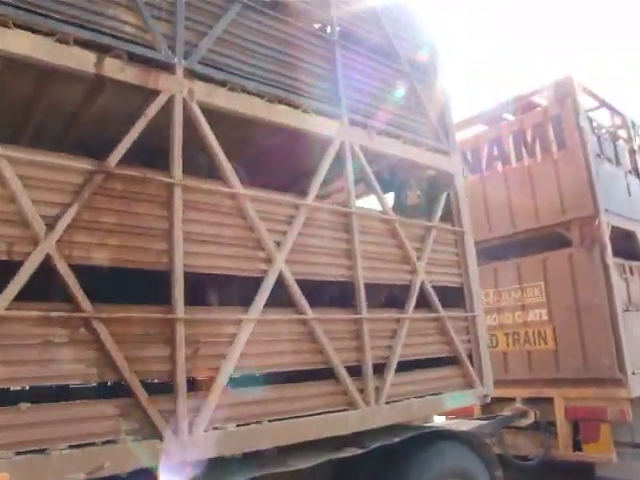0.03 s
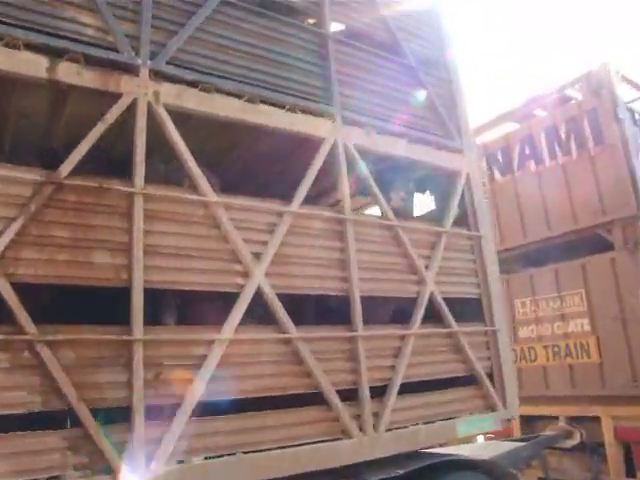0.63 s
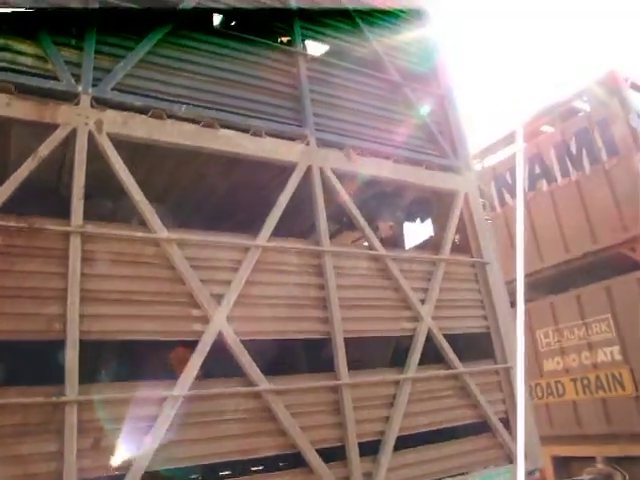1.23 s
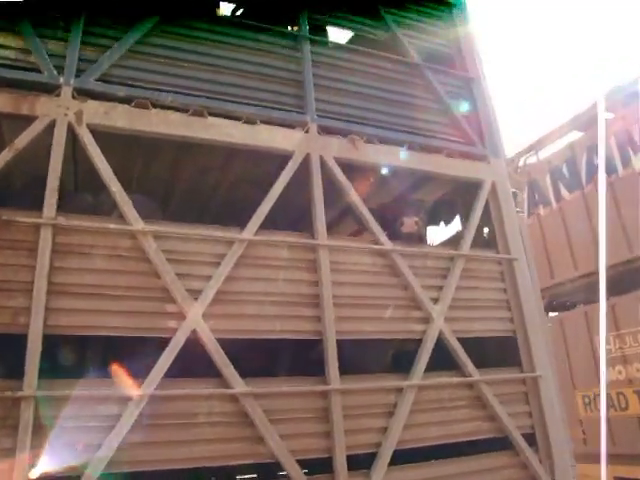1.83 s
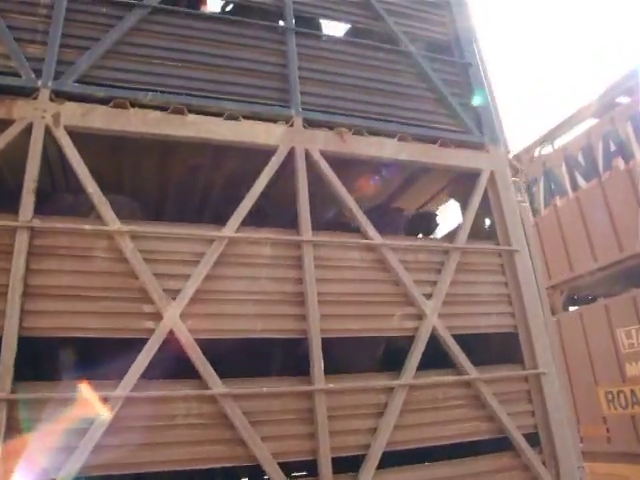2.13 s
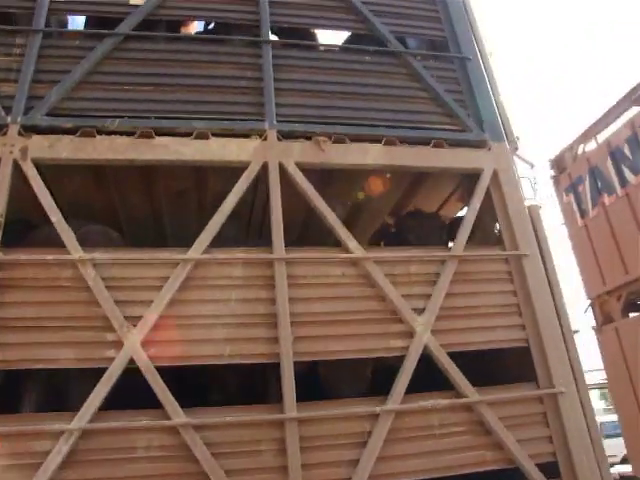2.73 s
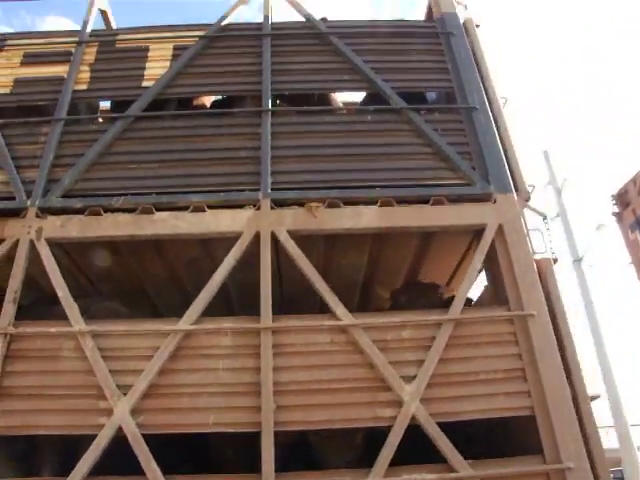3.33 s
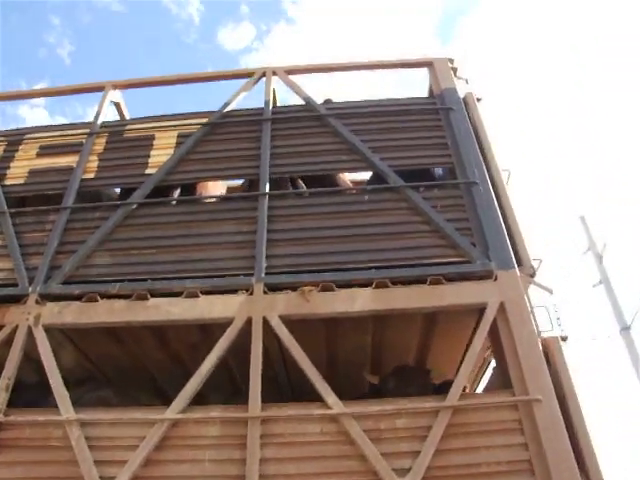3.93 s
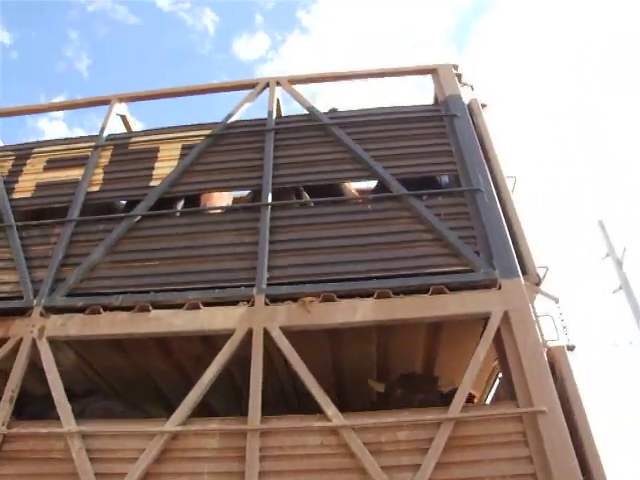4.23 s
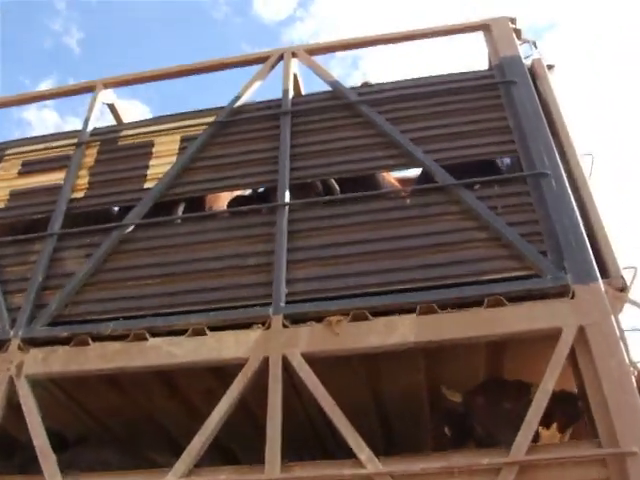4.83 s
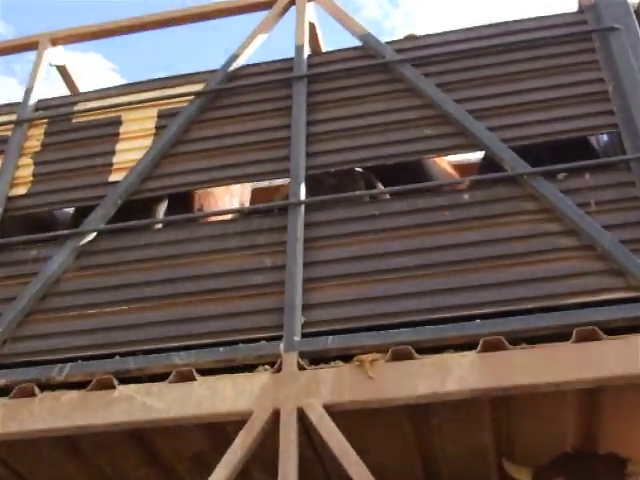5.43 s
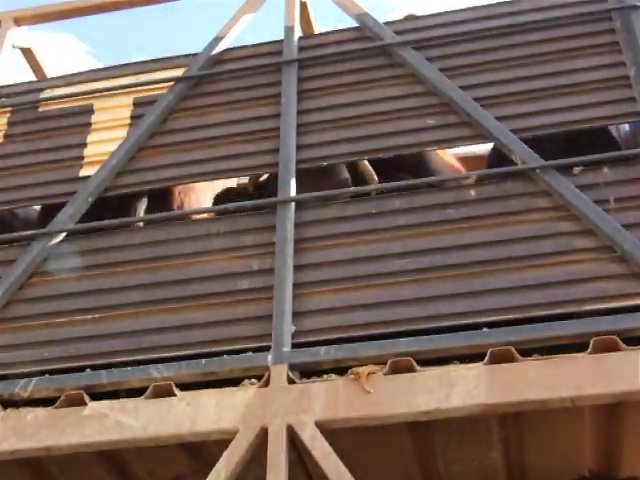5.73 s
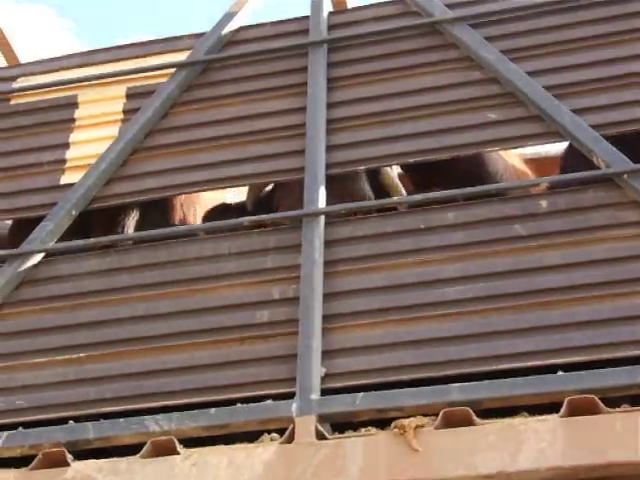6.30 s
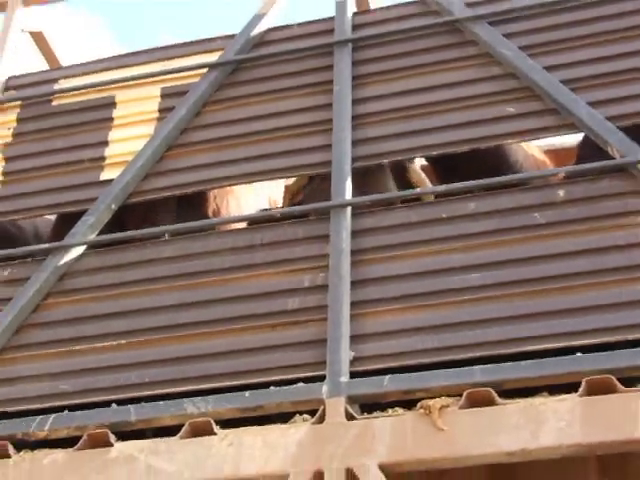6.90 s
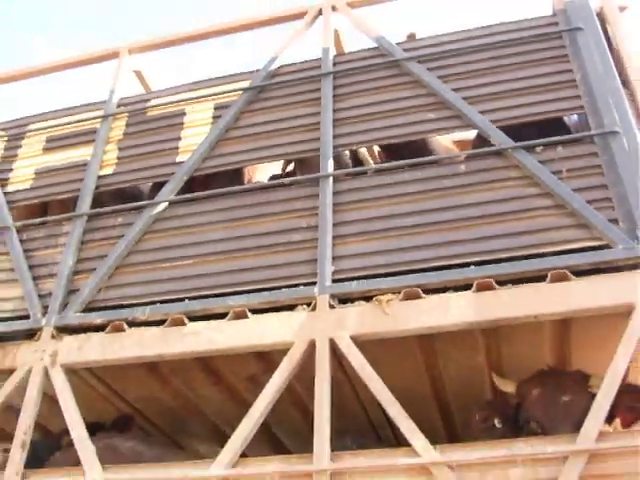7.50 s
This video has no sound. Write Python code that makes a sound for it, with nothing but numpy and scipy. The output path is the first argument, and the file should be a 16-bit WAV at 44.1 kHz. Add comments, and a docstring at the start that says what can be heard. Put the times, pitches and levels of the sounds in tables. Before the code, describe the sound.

Hooves knock and metal slats rattle as cattle shift inside a livestock trailer, while wind gusts rise over a distant engine hum.

```python
"""Cattle shift about in a steel livestock trailer parked outdoors, while an engine idles far off.
From the start, hooves shuffle and knock on the deck plates, bodies bump panels and gates, and horns
and loose fittings clack on the slats; the steel rings and its walls echo. The heaviest bump comes
near 2.8 s. From 4.4 s a bird whistles faintly now and then. After 5 s, turbulent wind buffets the
microphone more and more, up to the end."""
import sys
import numpy as np
from scipy import signal
from scipy.fft import rfft, irfft, next_fast_len
from scipy.io import wavfile
from scipy.ndimage import uniform_filter1d

SR = 44100
rng = np.random.default_rng(int(sys.argv[2]) if len(sys.argv) > 2 else 0)


def wav_record(signal):
    """Record a signal, one row per channel, as 16-bit PCM in the file named by sys.argv[1]."""
    frames = np.transpose(np.atleast_2d(signal))
    bounded = np.clip(frames, -1, 1)
    # unit amplitude maps onto the largest positive 16-bit level
    quanta = np.round(bounded * 32767).astype(np.int16)
    wavfile.write(sys.argv[1], SR, quanta)


N = 333396
T = np.arange(N) / SR

# Levels in the tables are relative: each source applies its own gain.
# spectrum of the open air: (frequency [Hz], level [dB])
AIR_SPECTRUM = [(10, -2), (30, -7.5), (55, 2), (68, -2.5), (85, -7), (200, -18.5), (500, -21.5),
                (1300, -29), (3000, -40), (7000, -39), (9000, -49.5)]
# harmonics of the idling engine: (frequency [Hz], level [dB])
ENGINE_HARMONICS = [(29.6, -51), (59.2, -44), (118.4, -51)]
# bird notes: (time [s], duration [s], mid frequency [Hz], glide [Hz/s], level [dB])
BIRD_NOTES = [(4.431, 0.083, 4150, 6003, -43), (4.435, 0.079, 3400, 3998, -44),
              (5.563, 0.055, 2950, -8000, -37), (7.163, 0.077, 2410, 2000, -35),
              (7.233, 0.065, 3060, -7000, -43), (7.346, 0.11, 2980, -3000, -39)]
# spectrum of the turbulence: (frequency [Hz], level [dB])
WIND_SPECTRUM = [(15, -15.5), (45, 0), (75, 0), (120, 1), (150, 0.5), (175, -1.5), (230, -2.5), (310, -7),
                 (450, -14.5), (800, -23.5), (1600, -42), (4000, -72)]
# wind strength: (time [s], level [dB])
WIND_LEVELS = [(0, -36), (1.6, -43), (2.7, -49), (3.35, -32), (3.88, -46), (4.1, -36), (4.7, -36.5),
               (5.17, -30), (5.4, -26.5), (5.8, -21), (6.1, -25), (6.55, -25.5), (6.8, -15.5), (7.08, -22),
               (7.56, -13)]
# strongest eddies: (peak time [s], level [dB], centre frequency [Hz], wake width [s])
EDDIES = [(.358, -8.5, 118, 0.031), (4.016, -11.5, 118, 0.0074), (4.388, -12.5, 128, 0.015),
          (4.981, -17.5, 91, 0.012), (5.333, -7, 235, 0.013), (5.486, -9, 78, 0.0034),
          (5.566, -11, 124, 0.011), (5.693, -5.5, 163, 0.0052), (5.837, -10, 218, 0.0085),
          (5.955, -16.5, 150, 0.0071), (6.21, -10.5, 160, 0.0063), (6.279, -10.5, 95, .007),
          (6.69, -6.5, 153, .007), (6.71, -0.5, 340, 0.0059), (6.804, -3, 181, 0.0063),
          (6.899, -9, 209, 0.0082), (7, -13, 159, 0.0097), (7.118, -11, 130, 0.011),
          (7.264, -6, 146, 0.012), (7.382, -3.5, 228, 0.0029), (7.459, -8, 220, 0.0081),
          (7.521, -7, 138, 0.0049)]
# reverberation in the trailer: (frequency [Hz], t60 [s])
TRAILER_DECAY = [(150, 0.59), (600, 0.42), (2000, 0.22), (8000, 0.28)]
# modes of the bars and frame: (frequency [Hz], level [dB], t60 [s])
FRAME_MODES = [(273, -14, 0.058), (547, -25, 0.053), (900, -24, 0.1), (1308, -26, 0.11), (2316, -16, 0.067),
               (4630, -18.5, 0.36), (6060, -13.5, .12), (7370, -6.5, 0.056)]
# restlessness of the herd: (time [s], trampling level [dB], scraping level [dB])
HERD_LEVELS = [(0, -32.5, -48), (.65, -42.5, -49), (.97, -34.5, -43), (1.3, -28, -42.5), (1.66, -39, -49),
               (2.05, -31.5, -40), (2.7, -44, -48.5), (3.2, -39, -38.5), (3.5, -40.5, -50),
               (3.88, -56, -47), (4.3, -30, -43), (4.66, -43, -44), (4.85, -32, -42), (5.17, -31.5, -38),
               (5.42, -40.5, -47), (5.62, -33.5, -50), (6.3, -45.5, -44), (6.6, -29, -45.5),
               (7.56, -35, -49)]
# spectrum of light steps: (frequency [Hz], level [dB])
TRAMPLE_SPECTRUM = [(60, -21), (160, 1), (290, 4), (450, 4), (750, 0), (1300, -4), (2000, -13), (3200, -22),
                    (5000, -20.5), (8000, -34.5)]
# spectrum of scraping: (frequency [Hz], level [dB])
SCRAPE_SPECTRUM = [(800, -13.5), (2000, 3), (3500, -6.5), (5000, -5.5), (7000, -3), (8500, -17)]
# bumps on a panel or gate: (time [s], level [dB], frequency [Hz], t60 [s])
PANEL_BUMPS = [(.01, -26, 298, 0.8), (.35, -21, 215, 0.068), (1.096, -20, 170, 0.23),
               (1.43, -13.5, 336, 0.071), (1.884, -14, 326, 0.13), (2.54, -16, 216, 0.2),
               (2.782, -6, 230, 0.1), (2.945, -13, 276, .079), (2.95, -21.5, 140, .2),
               (2.995, -24.5, 77, 1.44), (3.304, -26, 457, .1), (3.423, -23, 352.5, 0.22),
               (4.005, -24, 1980, 0.059), (4.45, -23.5, 395.6, 0.26), (5.638, -23, 1456, 0.13),
               (6.241, -33, 2580, 0.063), (6.289, -15, 496, 0.053), (6.494, -19, 2330, 0.12),
               (6.514, -15.5, 837, 0.11), (6.6, -31, 1160, 0.37), (7.257, -29, 1300, 0.044)]
# response of the slats: (frequency [Hz], level [dB])
SLAT_SPECTRUM = [(300, -23), (1000, -7.5), (2200, -4.5), (3500, -7.5), (5000, -2), (6300, -0.5),
                 (7400, 0.5), (8500, -11)]
# hard contacts on the slats: (time [s], level [dB], resonance [Hz], t60 [s])
SLAT_STRIKES = [(.38, -32, 6030, 0.27), (.549, -35.5, 3500, 0.11), (.823, -26, 4800, 0.046),
                (.869, -29, 7260, 0.16), (1.397, -19.5, 7140, 0.12), (1.518, -15, 5170, 0.051),
                (1.656, -31, 3800, 0.032), (1.713, -30, 5600, 0.3), (1.755, -27, 6760, 0.25),
                (1.829, -25, 5500, .084), (1.965, -11, 6430, 0.21), (2.22, -10.5, 7500, 0.11),
                (2.37, -29, 5640, 0.14), (2.459, -30.5, 6100, 0.19), (2.965, -19, 6800, 0.14),
                (3.089, -21.5, 6900, 0.25), (3.117, -14.5, 6840, .12), (3.156, -13, 6100, 0.11),
                (3.213, -12.5, 6330, 0.093), (3.331, -19, 7150, 0.11), (3.783, -38.5, 2310, 0.14),
                (4.026, -29, 5800, 0.091), (4.142, -31, 3630, 0.25), (4.244, -20, 7800, 0.17),
                (4.277, -18, 7600, 0.073), (4.578, -23.5, 6700, 0.13), (4.944, -8, 7860, 0.088),
                (5.112, -22, 4550, 0.045), (5.266, -27, 4030, 0.092), (5.331, -31, 3330, 0.076),
                (5.514, -17.5, 5500, 0.042), (5.638, -31, 4330, .12), (5.66, -19, 7300, 0.055),
                (5.734, -30, 7600, 0.27), (6.145, -37, 3900, .13), (6.498, -23, 3400, 0.077),
                (6.55, -30, 4200, .16), (6.7, -20, 7060, 0.091), (6.861, -30, 6550, 0.25),
                (7.035, -33, 3940, 0.17), (7.156, -32, 3860, 0.23), (7.214, -29.5, 4670, 0.1)]
# response of the deck: (frequency [Hz], level [dB])
DECK_SPECTRUM = [(60, -13), (150, -0.5), (300, 1), (700, 0.5), (1000, -1.5), (1450, -0.5), (1900, -1.5),
                 (3000, -11), (4500, -16.5), (8000, -46.5)]
# firm steps on the deck: (time [s], level [dB], treble level [dB], resonance [Hz], t60 [s])
HOOF_STRIKES = [(.054, -33, -28, 520, 0.13), (0.349, -21, -39, 700, 0.046), (.541, -11, -16.5, 670, 0.18),
                (.78, -17.5, -23, 706, 0.48), (0.89, -20, -42, 774, 0.37), (1.099, -20, -41, 497, 0.12),
                (1.148, -18, -32, 464, 0.17), (1.196, -8.5, -27, 790, 0.26),
                (1.229, -17.5, -24, 1360, 0.27), (1.325, -16.5, -34, 595, 0.12),
                (1.433, -6, -21.5, 666, 0.11), (1.517, -11, -14.5, 1244, 0.13),
                (1.655, -17.5, -9.5, 580, 0.14), (1.835, -19, -20, 604, 0.17),
                (1.886, -12.5, -33, 700, 0.26), (1.971, -16.5, -5, 720, 0.24), (2.187, -14, -19, 504, 0.31),
                (2.326, -23, -29, 659, 0.44), (2.45, -21, -19, 670, 0.56), (2.783, -29, -20, 610, 0.26),
                (2.945, -18.5, -20, 634, 0.19), (3.23, -15, -10.5, 1000, 0.19),
                (3.304, -21.5, -13.5, 437, 0.53), (3.714, -17.5, -17.5, 1020, .16),
                (3.967, -15.5, -22, 890, 0.47), (4.165, -21, -17, 1060, 0.44),
                (4.285, -15.5, -15, 1180, .25), (4.376, -19, -15.5, 1690, 0.036),
                (4.499, -18.5, -51, 830, 0.31), (4.794, -13, -22, 980, 0.21),
                (5.071, -23, -11.5, 920, 0.73), (5.253, -14.5, -20, 626, 0.27),
                (5.333, -18, -15.5, 600, 0.14), (5.637, -12.5, -18, 1570, .12),
                (5.749, -20.5, -15.5, 520, 0.38), (5.924, -25.5, -16.5, 600, 0.36),
                (6.15, -27.5, -16, 520, 0.29), (6.444, -17, -20.5, 1120, .13),
                (6.496, -18.5, -16, 2360, 0.31), (6.584, -13.5, -45, 920, .28),
                (6.796, -16.5, -13, 1010, 0.077), (6.895, -22.5, -12.5, 694, 0.18),
                (6.98, -28, -8, 594, 0.14), (7.083, -21.5, -19, 1640, 0.17), (7.207, -15.5, -17, 800, 0.17)]


def amp(db):
    """Amplitude ratio of a level in decibels."""
    return 10 ** (np.asarray(db) / 20)


def unit(x):
    """Normalisation to rms 1."""
    return x / np.sqrt(np.mean(x ** 2) + 1e-20)


def read(points, hz):
    """Interpolation of a curve on a log-frequency axis."""
    f, value = np.transpose(points)
    return np.interp(np.log(hz + 1), np.log(f + 1), value)


def add(mix, s, sound):
    """Superposition: a sound joins the mix at s seconds."""
    part = mix[max(round(s * SR), 0):][:len(sound)]
    part += sound[:len(part)]


def colour(x, *spectra, size=4096):
    """Minimum-phase filtering: spectra in cascade add in decibels."""
    hz = abs(np.fft.fftfreq(size, 1 / SR))
    log_gain = np.log(amp(sum(read(s, hz) for s in spectra)))
    taps = np.fft.ifft(np.exp(np.conj(signal.hilbert(log_gain)))).real
    return signal.fftconvolve(x, taps[:size // 2])[:len(x)]


def drift(hz, size=N):
    """Random fluctuation: noise of rms 1, low-passed at hz."""
    padded = next_fast_len(size)
    f = np.fft.rfftfreq(padded, 1 / SR)
    spectrum = rfft(rng.standard_normal(padded)) / (1 + (f / hz) ** 4)
    return unit(irfft(spectrum, padded)[:size])


def peak_rms(x, band_hz, size=660):
    """Highest short-time rms within a band."""
    inside = signal.sosfilt(signal.butter(2, band_hz, "band", fs=SR, output="sos"), x)
    return np.sqrt(uniform_filter1d(inside ** 2, size).max())


def grains(per_s, spread_db, size=N):
    """Shot noise: random contacts of either sign, many small and a few large."""
    sizes = amp(spread_db * np.minimum(rng.exponential(1, size), 4))
    return unit(sizes * rng.choice([-1, 1], size) * (rng.random(size) < per_s / SR))


def plate(hz, prominence_db, width_hz, ripple_db, count=90):
    """Response of sheet steel, one resonance among random peaks: (frequency [Hz], level [dB])."""
    coarse = np.geomspace(200, 9000, count)
    fine = np.geomspace(200, 9000, 8 * count)
    ripple = np.interp(fine, coarse, ripple_db * rng.uniform(-1, 1, count))
    resonance = prominence_db / (1 + ((fine - hz) / width_hz) ** 2)
    return np.column_stack([fine, ripple + resonance])


def open_air(level_db=-39):
    """Ambient noise: a broadband rumble, strongest at low frequencies."""
    return amp(level_db) * unit(colour(rng.standard_normal(N), AIR_SPECTRUM))


def engine(waver=0.016):
    """A distant idling engine is nearly periodic, so its harmonics waver in pitch together."""
    clock = np.cumsum(1 + waver * drift(6.4)) / SR
    return sum(np.sqrt(2) * amp(db + 3.7 * drift(21)) * np.sin(2 * np.pi * hz * clock)
               for hz, db in ENGINE_HARMONICS)


def bird(level_db=-4):
    """Frequency modulation: faint whistles glide and quaver, smeared by echoes from the trucks."""
    out = np.zeros(N)
    for s, length, pitch, glide, db in BIRD_NOTES:
        t = np.arange(int(length * SR)) / SR
        quaver = 1 + .03 * drift(350, size=len(t))
        hz = (pitch + glide * (t - length / 2)) * quaver
        whistle = np.sin(2 * np.pi * np.cumsum(hz) / SR)
        add(out, s, amp(db + level_db) * np.sin(np.pi * t / length) * whistle)
    return reverberation(out, wet_db=-4)


def wind(level_db=-1, lumpy_db=2.0, eddy_db=-3, wake_db=-10, cycles=0.61):
    """Turbulence at the microphone: each strong eddy is one pressure swing in a short ragged wake."""
    turbulence = colour(rng.standard_normal(N) * amp(lumpy_db * drift(30)), WIND_SPECTRUM)
    out = amp(np.interp(T, *np.transpose(WIND_LEVELS)) + level_db) * unit(turbulence)
    t = np.arange(-SR // 10, SR // 10) / SR
    for s, db, hz, wake_s in EDDIES:
        swing = np.exp(-(hz * t / cycles) ** 2) * np.cos(2 * np.pi * (hz * t + rng.random()))
        wake = unit(colour(rng.standard_normal(len(t)), WIND_SPECTRUM, [(200, 1), (700, 5)]))
        wake *= np.exp(-(t / wake_s) ** 2 / 2)
        add(out, s + t[0], amp(db + eddy_db) * (swing + amp(wake_db) * wake))
    return out


def reverberation(x, wet_db=-12, build_s=0.01):
    """Dense reflections between steel walls decay exponentially, the bass most slowly."""
    hz, t, noise = signal.stft(rng.standard_normal(SR), SR, nperseg=256)
    decay = amp(-60 * t / read(TRAILER_DECAY, hz)[:, None])
    tail = signal.istft(noise * decay * np.minimum(t / build_s, 1), SR, nperseg=256)[1]
    return x + amp(wet_db) * signal.fftconvolve(x, tail / np.linalg.norm(tail))[:N]


def frame_ring(x, ring_db=-41):
    """Sympathetic vibration: contacts excite the damped modes of the bars and frame."""
    t = np.arange(SR // 2) / SR
    ring = sum(amp(db - 60 * t / t60) * np.cos(2 * np.pi * hz * t) for hz, db, t60 in FRAME_MODES)
    return x + amp(ring_db) * signal.fftconvolve(x, ring)[:N]


def fidget(strikes, share_db, lead_s=0.021, settle_s=0.074):
    """Envelope of animals stirring before each blow and settling after it; incoherent powers add."""
    power = np.zeros(N)
    for s, db, *_ in strikes:
        envelope = np.exp(-np.maximum((s - T) / lead_s, (T - s) / settle_s))
        power += (amp(db + share_db) * envelope) ** 2
    return np.sqrt(power)


def shuffle(scrape_db=-2, steps_per_s=5, step_s=0.019, plates=7):
    """Impact and friction noise: light steps overlap while hides and grit scrape along the steel."""
    feet, grit = np.zeros(N), np.zeros(N)
    for place in (np.arange(plates) + .5) / plates:
        footfalls = rng.random(N) < steps_per_s / SR
        steps = signal.lfilter([1], [1, -np.exp(-1 / (step_s * SR))], footfalls)
        spot = plate(270 * 5 ** place, prominence_db=1.6, width_hz=50, ripple_db=8.5, count=50)
        feet += unit(colour(grains(3000, 2.67) * np.sqrt(steps + 0.024), TRAMPLE_SPECTRUM, spot))
        pressure = amp(7 * np.tanh(drift(14)))
        slat = plate(2000 + 5500 * place, prominence_db=2, width_hz=200, ripple_db=3.5)
        grit += unit(colour(grains(1500, 1.6) * pressure, SCRAPE_SPECTRUM, slat))
    s, trample, scrape = np.transpose(HERD_LEVELS)
    trampling = np.hypot(amp(np.interp(T, s, trample)), fidget(HOOF_STRIKES, share_db=-20))
    scraping = np.hypot(amp(np.interp(T, s, scrape) + scrape_db), fidget(SLAT_STRIKES, share_db=-31))
    return trampling * unit(feet) + scraping * unit(grit)


def panel_bumps(split=0.085, pair_db=-8, slap_db=-9, rise_share=0.031):
    """Free vibration: a bumped panel rings in one mode and two briefer neighbours, with a dull slap."""
    out, t = np.zeros(N), np.arange(SR) / SR
    for s, db, hz, t60 in PANEL_BUMPS:
        swell = 1 - np.exp(-t / (rise_share * t60))  # long-ringing panels speak more slowly
        fade = amp(-60 * t / t60)
        phase = 2 * np.pi * hz * t
        pair = np.sin(phase * (1 + split)) + np.sin(phase * (1 - 2 * split))
        slap_spectrum = [(hz / 4, -8), (hz, 0), (2 * hz, -14), (8 * hz, -40)]
        slap = unit(colour(rng.standard_normal(len(t)), slap_spectrum))
        panel = np.sin(phase) + amp(pair_db) * fade * pair + amp(slap_db) * slap
        add(out, s, amp(db) * swell * fade * panel)
    return out


def slat_clacks(level_db=-11, rise_s=0.0025, body_db_per_octave=-11):
    """A brief, hard contact excites high frequencies: a slat snaps, then rattles and dies away fast."""
    out, t = np.zeros(N), np.arange(SR // 3) / SR
    for s, db, hz, t60 in SLAT_STRIKES:
        rattle = (1 - np.exp(-t / rise_s)) * amp(-60 * t / t60) * grains(5000, 0.7, size=len(t))
        rattle[40] += amp(18 - 40 * t60)  # the drier the clack, the harder its first snap
        body_db = 2 + body_db_per_octave * np.log2(hz / 5800)  # lower slats have more body
        spot = plate(hz, prominence_db=5, width_hz=160, ripple_db=3.5)
        clack = colour(rattle, SLAT_SPECTRUM, [(4200, body_db), (6000, 0.0047)], spot)
        add(out, s, amp(db + level_db) * clack / peak_rms(clack, band_hz=(5500, 8500)))
    return out


def hooves(level_db=-10, rise_share=0.0009, hold_share=0.074, strike_db=8, bass_db_per_octave=-11.5):
    """Impact excitation: a hoof sets a deck plate chattering, filtered by the plate's resonances."""
    out, t = np.zeros(N), np.arange(SR // 2) / SR
    for s, db, treble_db, hz, t60 in HOOF_STRIKES:
        swell = 1 - np.exp(-t / (rise_share * t60))  # drawn-out steps roll on more softly
        fade = amp(-60 * np.maximum(t / t60 - hold_share, 0))
        blow = swell * fade * grains(5000, 2.73, size=len(t))
        blow[0] += amp(strike_db)
        bass_db = 1.5 + bass_db_per_octave * np.log2(hz / 710)  # big, low plates give more bass
        hardness = [(300, bass_db), (600, 0.0042), (1280, 0.0083), (2100, treble_db + 11)]
        spot = plate(hz, prominence_db=7, width_hz=90, ripple_db=7, count=40)
        knock = colour(blow, DECK_SPECTRUM, hardness, spot)
        add(out, s, amp(db + level_db) * knock / peak_rms(knock, band_hz=(450, 1500)))
    return out


def scene():
    """Superposition of the herd in its reverberant trailer and the sounds outdoors, in mono."""
    contacts = hooves() + slat_clacks() + shuffle()
    herd = reverberation(frame_ring(contacts) + panel_bumps())
    return (herd + wind() + engine() + open_air() + bird())[None]


def record(dry, ceiling=0.75, cutoff_hz=8550):
    """Soft saturation rounds off the strongest buffets; a steep low-pass filter ends the treble."""
    rounded = dry / (1 + (dry / ceiling) ** 4) ** .25
    faded = rounded * signal.windows.tukey(N, .001)
    taps = signal.firwin(161, cutoff_hz, window=("kaiser", 8), fs=SR)
    return signal.oaconvolve(faded, taps[None], "same")


dry = scene()
out = record(dry)
wav_record(out)
```